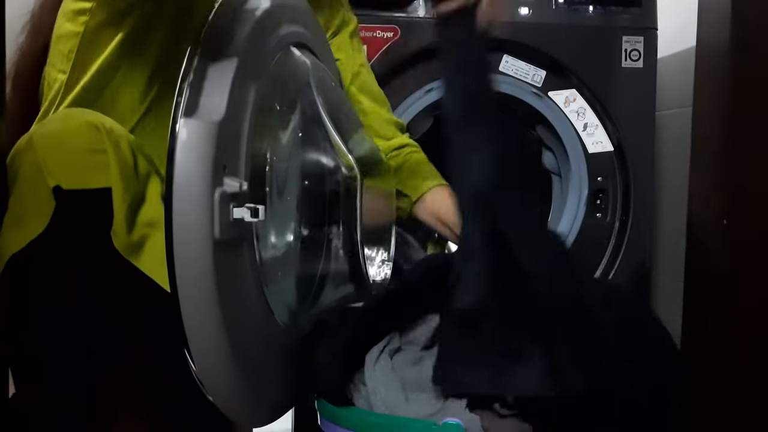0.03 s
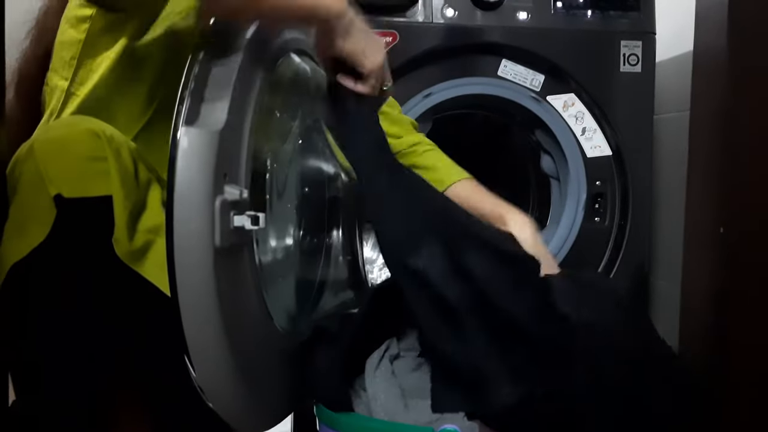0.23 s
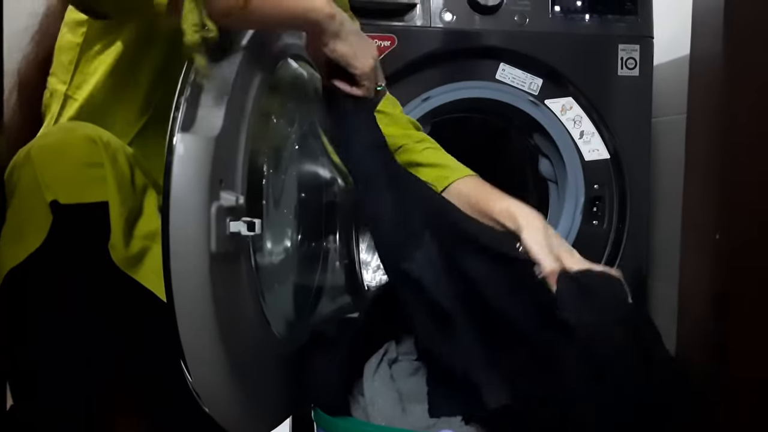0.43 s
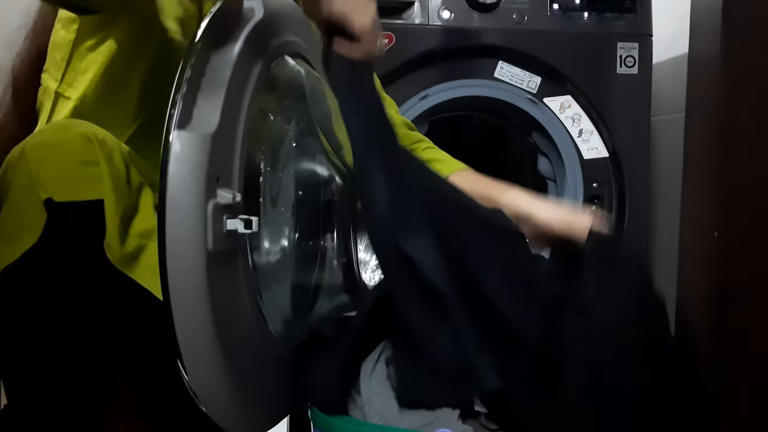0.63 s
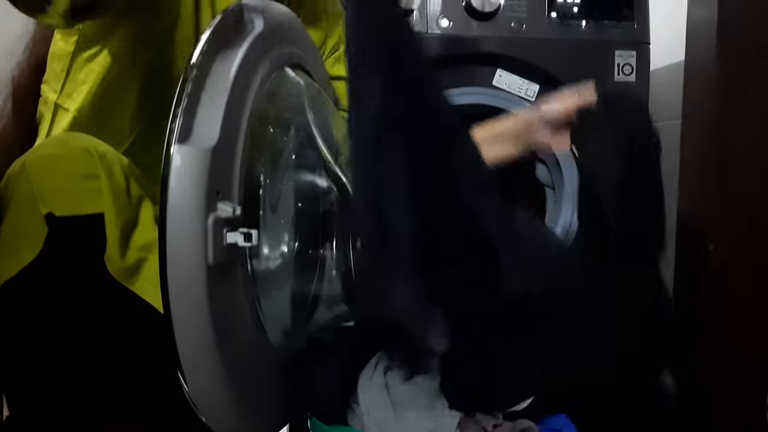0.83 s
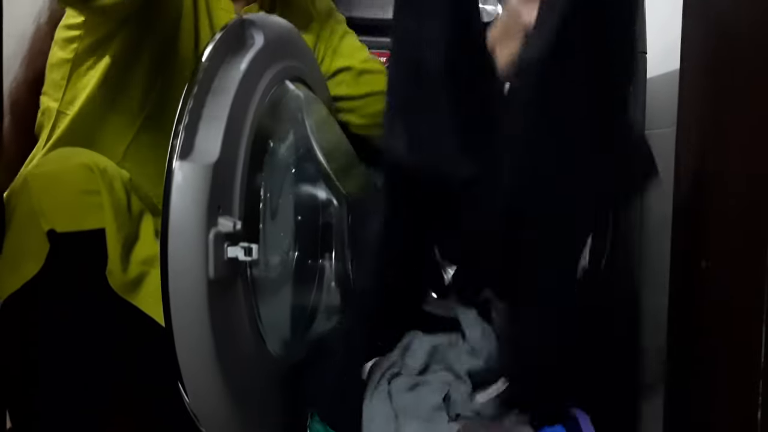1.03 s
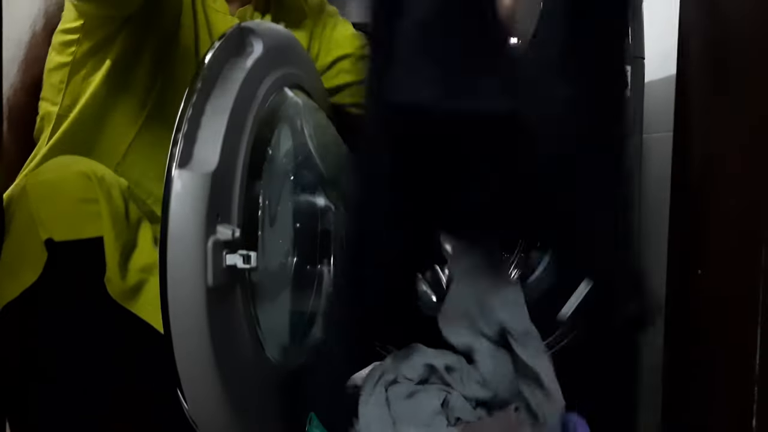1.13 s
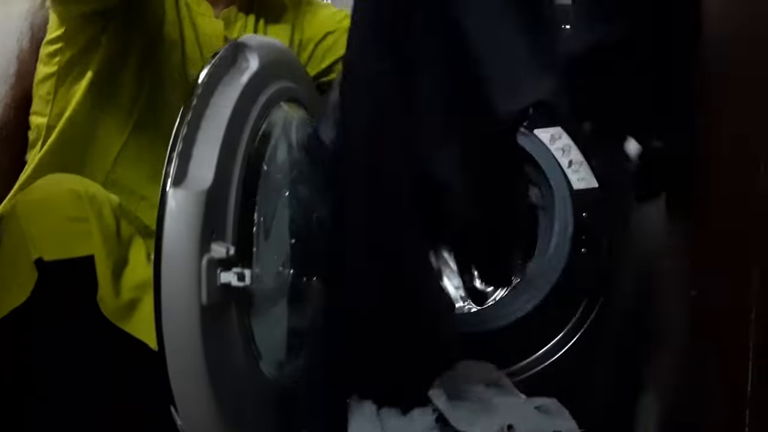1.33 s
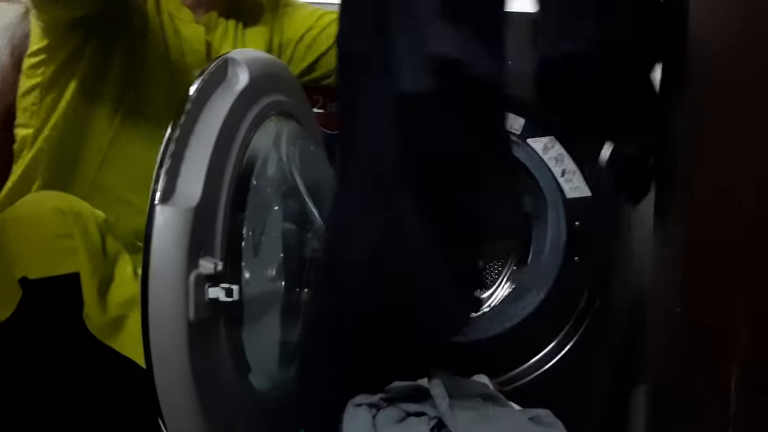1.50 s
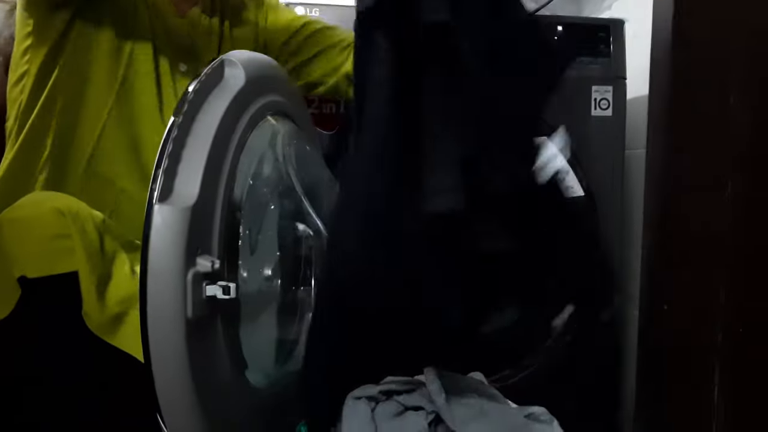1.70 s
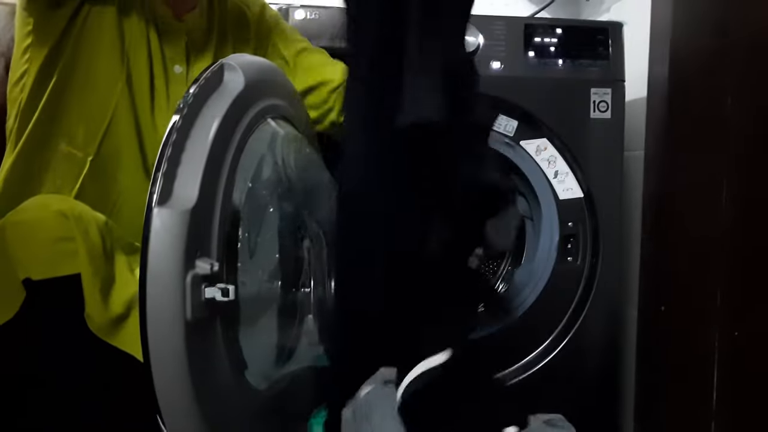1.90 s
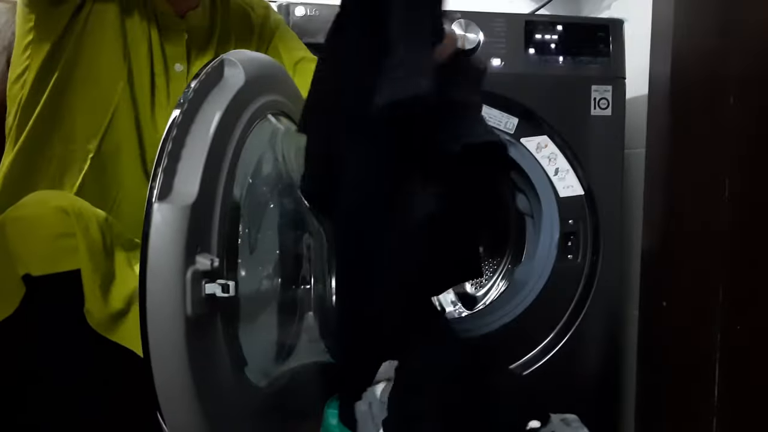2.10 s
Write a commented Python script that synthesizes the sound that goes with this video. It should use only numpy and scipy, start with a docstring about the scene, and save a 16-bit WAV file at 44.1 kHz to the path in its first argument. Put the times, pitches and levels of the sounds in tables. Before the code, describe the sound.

A washing machine door knocks with a hollow boom as laundry rustles and thumps softly.

```python
"""A small room, close to a front-loading washing machine as the clothes are pulled out.
Cloth brushes and rubs throughout, with soft thumps of laundry against the machine and basket.
The open door is bumped and knocks back on its hinge: plastic clicks, a boom, ringing panels.
A faint whine follows, and near the end a lifted garment swishes twice.
Underneath lie room rumble and hiss, a low drone and one swelling hum."""
import sys
import numpy as np
from scipy import signal
from scipy.fft import rfft, irfft
from scipy.io import wavfile
from scipy.ndimage import uniform_filter1d

SR = 44100
rng = np.random.default_rng(int(sys.argv[2]) if len(sys.argv) > 2 else 0)


def to_wav(sig):
    """Store sig (one row per channel, or 1-D mono) as 16-bit WAV at the path in sys.argv[1].

    Samples outside -1..1 are clipped; the rate is SR.
    """
    pcm = np.clip(np.atleast_2d(sig), -1, 1) * 32767
    pcm = np.round(pcm).astype(np.int16)
    wavfile.write(sys.argv[1], SR, pcm.T)  # frames by channels


N = 94815
TIME_S = np.arange(N) / SR


def amp(db):
    """Decibels to gain."""
    return 10 ** (np.asarray(db) / 20)


def unit(x):
    """Scale to rms 1."""
    return x / np.sqrt(np.mean(x ** 2))


def eq_curve(points):
    """Gain at each frequency from (freq_hz, level_db) points."""
    hz, db = np.array(points, float).T
    return amp(np.interp(np.log(np.arange(N // 2 + 1) * SR / N + 1), np.log(hz), db))


# Stereo width of every noise layer: freq_hz, side_over_mid_db
WIDTH = [(60, -15), (200, -11.5), (380, -4.5), (700, -3.5), (1300, 2.5), (2500, -0.5), (16000, 1.5)]

def colour(pair, points):
    """EQ two unrelated signals into stereo at rms 1, narrow in the bass and wide in the treble."""
    mid, side = rfft(pair)
    width = eq_curve(WIDTH)
    left_right = np.array([mid + width * side, mid - width * side]) / np.hypot(1, width)
    return unit(irfft(left_right * eq_curve(points), N))


def noise(points):
    """Stereo noise of a given colour."""
    return colour(rng.standard_normal((2, N)), points)


def wander(rate_hz):
    """Smooth random modulation at rms 1."""
    step = max(int(SR / rate_hz), 2)
    held = np.resize(np.repeat(rng.standard_normal(400), step), N)
    return unit(uniform_filter1d(uniform_filter1d(held, step), step))


def envelope(age, rise, t60, hold=0):
    """Linear rise, hold and exponential decay, all in seconds."""
    decay = np.exp(-np.log(1000) * np.maximum(age - rise - hold, 0) / t60)
    return np.clip(age / rise, 0, 1) * decay


def ring(age, modes, rise):
    """Struck modes, slightly detuned at each hit; left and right drift out of phase in the higher ones."""
    detune_spread, fully_wide_hz = .005, 900
    out = 0
    for (hz, db, t60), (detune, side) in zip(modes, rng.standard_normal((len(modes), 2))):
        skew = side * min(hz / fully_wide_hz, 1) ** 2 * np.array([[1], [-1]])
        phase = 2 * np.pi * hz * (1 + detune_spread * detune) * age
        out = out + amp(db) * envelope(age, rise, t60) * np.sin(phase + skew)
    return out


def wavering_tone(hz):
    """A sine whose pitch and level waver slightly."""
    pitch_hz = hz * (1 + .0056 * wander(rate_hz=25.64))
    waver_db = -.64 * wander(rate_hz=9.04)
    return np.sqrt(2) * np.sin(2 * np.pi * np.cumsum(pitch_hz) / SR) * amp(waver_db)


def friction(points):
    """Cloth friction: a smooth rub plus tiny catches of threads, flickering in level."""
    catches_per_s, catch_db, flicker_db = 1700, -11, 1.5
    catches = rng.standard_normal((2, N)) * (rng.random(N) < catches_per_s / SR)
    rub = rng.standard_normal((2, N)) + amp(catch_db) * unit(catches)
    return colour(rub, points) * amp(flicker_db * wander(rate_hz=45))


# EQ of the room's rumble and of its hiss: freq_hz, gain_db
RUMBLE_EQ = [(20, -6), (40, -20), (56, -11.5), (80, -5), (108, 5.5), (150, -11), (240, -14), (420, -15.5),
             (700, -24.5), (1400, -17.5), (3000, -49)]
HISS_EQ = [(500, 8.5), (1500, 0.5), (3000, 0.5), (6000, -3.5), (10000, 0), (16000, -4)]

def room_tone():
    """A steady bed of low rumble and faint hiss."""
    return amp(-53.5) * noise(RUMBLE_EQ) + amp(-64) * noise(HISS_EQ)


# Low drone tones: pitch_hz, level_db, start_s, end_s
DRONE_TONES = [(54.85, -55, 0.3, 2.3), (71.3, -58.5, -.2, 0.72), (68.8, -53, 1.33, 1.75),
               (70.1, -60.5, 1.66, 2.3), (177.8, -61.5, 1.16, 2.2)]

def drone():
    """Overlapping low tones, each fading quickly in and out."""
    fade_s = .027
    out = 0
    for hz, db, start, end in DRONE_TONES:
        fade = np.clip(np.minimum(TIME_S - start, end - TIME_S) / fade_s, 0, 1)
        out = out + amp(db) * fade * wavering_tone(hz)
    return out


# Fader moves of the sliding cloth: time_s, brush_db, rub_db
SLIDE_LEVELS = [(0, -66, -54), (.11, -70.5, -64), (.17, -58, -53.5), (.22, -60, -57), (.45, -73, -61.5),
                (.55, -91, -55.5), (.63, -70, -56.5), (.74, -60.5, -58), (.85, -65.5, -59), (.96, -61, -54),
                (1.08, -56, -56.5), (1.15, -63.5, -61.5), (1.21, -59, -54), (1.29, -64, -58.5),
                (1.38, -56.5, -51.5), (1.48, -59.5, -54), (1.63, -63.5, -57.5), (1.78, -55.5, -53),
                (2.15, -61, -58)]
# EQ of the light brushing and of the duller rubbing: freq_hz, gain_db
BRUSH_EQ = [(500, 3.5), (1500, 4), (2200, 3.5), (4000, -1), (8000, 0.5), (10000, -7.5), (12000, -0.5),
            (16000, -4)]
RUB_EQ = [(100, -3), (170, -3), (240, 1.5), (330, -3), (450, -1), (600, -4.5), (900, -10.5), (1500, -19),
          (2500, -19), (5000, -23), (12000, -49)]

def sliding_cloth():
    """Garments slide all the time, a bright brush over a dull rub."""
    times, brush_db, rub_db = np.array(SLIDE_LEVELS).T
    brush = friction(BRUSH_EQ) * amp(np.interp(TIME_S, times, brush_db))
    rub = friction(RUB_EQ) * amp(np.interp(TIME_S, times, rub_db))
    return brush + rub


# Soft hits of laundry: start_s, level_db
THUMPS = [(0.117, -50), (0.191, -42.5), (0.396, -39.5), (0.499, -45.5), (0.566, -44), (0.595, -45.5),
          (0.88, -41.5), (1.065, -47.5), (1.189, -50.5), (1.911, -41.5), (2.051, -49)]
# Hollow ring under each hit: pitch_hz, gain_db, t60_s
HOLLOW_MODES = [(101.3, -2.5, 0.27), (125.3, 1.5, 0.13), (202.8, -3, 0.064), (362, -14, 0.19)]

def laundry_thumps():
    """Laundry bumps softly against the machine and basket, which ring hollow."""
    return sum(amp(db) * ring(TIME_S - start, HOLLOW_MODES, rise=.0059) for start, db in THUMPS)


# Door hits: start_s, boom_db, click_db, panel_db, click_cutoff_hz, push_s, scrape_s
KNOCKS = [(0.2165, -24.5, -33, -27.5, 15800, 0.0036, 0.0013),
          (0.246, -37, -63, -42.5, 5000, 0.0042, 0.0045), (0.288, -49, -48, -39, 5000, 0.019, 0.0029),
          (0.357, -38, -43.5, -38.5, 3000, 0.0058, 0.0042), (0.386, -36.5, -46, -39, 1900, 0.0064, 0.0025)]
# Boom of the door and short ring of its plastic rim: pitch_hz, gain_db, t60_s
DOOR_MODES = [(111, -35, 0.23), (141.8, 0, 0.2), (146, -25, 0.14), (247.3, -16, 0.71), (280.3, -18, 0.54),
              (356.2, -9, 0.23), (368.7, -9, 0.29), (386, -34, 0.3), (660, -30, 0.35), (643, -40, 0.1),
              (812, -29.5, 0.56), (897, -23, 0.23), (929, -13, 0.32)]
RIM_MODES = [(1430, -3, .16), (1700, -6, .15), (2500, -3, .12), (3030, -4, .12), (3510, -2, .12),
             (4215, 0, .13), (4370, -2, .12), (6000, -7, .08)]
# EQ of the contact click and of the panels' dense ringing: freq_hz, gain_db
CLICK_EQ = [(200, -7.5), (900, 8), (1500, 2), (2150, -4), (2600, 0), (3800, -3.5), (4250, 2), (5300, -8),
            (6100, -7.5), (8000, -15.5), (10000, -16.5), (11700, -5), (16000, -10.5)]
PANEL_EQ = [(50, -28), (130, 14), (190, -19), (260, -2), (395, 9), (440, -30), (520, -19.5), (620, 4),
            (720, 0.5), (830, -8), (970, 3.5), (1100, -21.5), (1550, -12), (2100, -27.5), (2600, -24.5),
            (3800, -30.5), (4400, -34), (5300, -36), (7500, -48), (15000, -44)]

def door_knocks():
    """Plastic clicks on contact, then the door booms and the panels ring; rebounds are duller."""
    tail_db, rim_db, body_lag_s = -16, -12, .004025
    out = 0
    for start, boom_db, click_db, panel_db, cutoff_hz, push, scrape in KNOCKS:
        age = TIME_S - start
        rolloff_db = lambda hz: 10 * np.log10(1 + (hz / cutoff_hz) ** 2)
        snap = envelope(age, scrape, t60=.028, hold=.0016)
        tail = amp(tail_db) * envelope(age, scrape, t60=.7)
        crack = (snap + tail) * noise([(hz, db - rolloff_db(hz)) for hz, db in CLICK_EQ])
        rim = ring(age, [(hz, db - rolloff_db(hz), t60) for hz, db, t60 in RIM_MODES], scrape)
        click = crack + amp(rim_db) * rim
        boom = ring(age - body_lag_s, DOOR_MODES, push)
        panels = envelope(age - body_lag_s, push, t60=.32) * noise(PANEL_EQ)
        out = out + amp(click_db) * click + amp(boom_db) * boom + amp(panel_db) * panels
    return out


# Swell of the whine after the knocks: start_s, rise_s, hold_s, t60_s, level_db
WHINE_SWELL = (.38, .05, .2, 1.1, -66)
# Its narrow resonance: freq_hz, gain_db
WHINE_EQ = [(1000, -35), (1350, -13), (1800, -20), (1960, -7), (2060, 0), (2160, -7), (2300, -17),
            (3500, -40)]

def whine():
    """A faint, airy resonance that swells and dies away."""
    start, rise, hold, t60, db = WHINE_SWELL
    return amp(db) * envelope(TIME_S - start, rise, t60, hold) * noise(WHINE_EQ)


# Glide of the hum: time_s, pitch_hz, level_db
HUM_GLIDE = [(1.1, 93.9, -71), (1.19, 95.8, -49), (1.3, 103.6, -50), (1.45, 95.6, -49), (1.6, 83.2, -60),
             (1.751, 84.4, -77)]

def hum():
    """One low hum swells, lifts in pitch, then sinks away."""
    times, pitch_hz, level_db = np.array(HUM_GLIDE).T
    swell = np.interp(TIME_S, times, amp(level_db), left=0, right=0)
    return swell * wavering_tone(np.interp(TIME_S, times, pitch_hz))


# Quick lifts of a garment: peak_s, rise_s, fall_s, swish_db, left_over_right_db, flutter_db
SWISHES = [(1.88, 0.05, 0.062, -49, 0, -43), (2.074, .022, 0.049, -54, -3, -62.5)]
# EQ of the airy swish and of its low flutter: freq_hz, gain_db
SWISH_EQ = [(300, -2), (1000, 0), (1900, 1.5), (3000, 1.5), (4200, -2), (5200, -6.5), (8000, -6.5),
            (10000, -8.5), (12500, -7.5), (16000, -8.5)]
FLUTTER_EQ = [(90, -18), (170, -3), (210, 0), (340, 0), (450, -2), (600, -1), (850, -13), (1500, -24),
              (4000, -45)]

def garment_swishes():
    """Lifted cloth swishes in step with its speed; the flutter grows with speed squared."""
    out = 0
    for peak, rise, fall, swish_db, pan_db, flutter_db in SWISHES:
        speed = np.exp(-.5 * ((TIME_S - peak) / np.where(TIME_S < peak, rise, fall)) ** 2)
        swish = speed * amp(swish_db) * friction(SWISH_EQ)
        flutter = speed ** 2 * amp(flutter_db) * friction(FLUTTER_EQ)
        pan = amp(np.array([[pan_db], [-pan_db]]) / 2)
        out = out + (swish + flutter) * pan
    return out


# Stereo balance of the whole mix: freq_hz, left_over_right_db
BALANCE = [(60, 2), (200, 2), (400, 1), (1000, 1.3), (4000, 0), (8000, 1), (13000, 4), (16000, 4)]

def scene():
    """Door, laundry and room, leaning a little to the left."""
    mix = door_knocks() + laundry_thumps() + sliding_cloth() + garment_swishes()
    mix = mix + whine() + room_tone() + drone() + hum()
    lean = np.sqrt(eq_curve(BALANCE))
    return irfft(rfft(mix) * np.array([lean, 1 / lean]), N)


def record(dry):
    """Master filters trim the deepest bass and the very top."""
    low_cut_hz, high_cut_hz = 49, 16000
    low_cut = signal.butter(4, low_cut_hz, "high", fs=SR, output="sos")
    high_cut = signal.ellip(10, .2, 70, high_cut_hz, fs=SR, output="sos")
    return signal.sosfilt(high_cut, signal.sosfilt(low_cut, dry))


dry = scene()
out = record(dry)
to_wav(out)
```